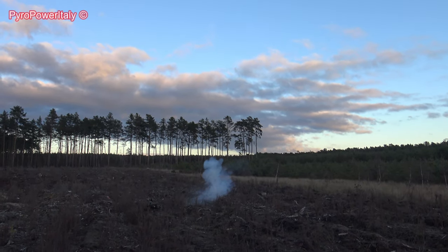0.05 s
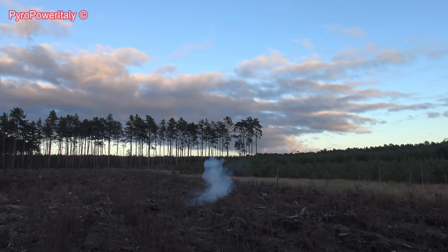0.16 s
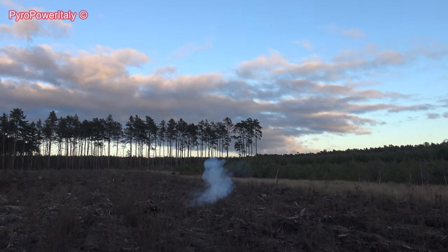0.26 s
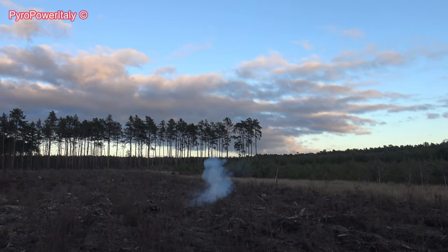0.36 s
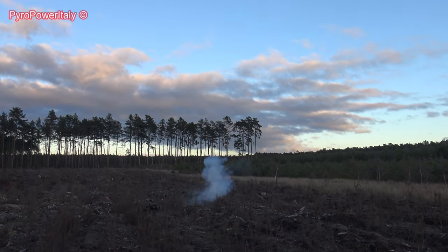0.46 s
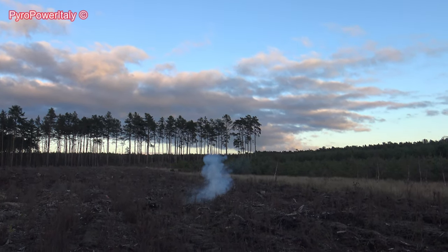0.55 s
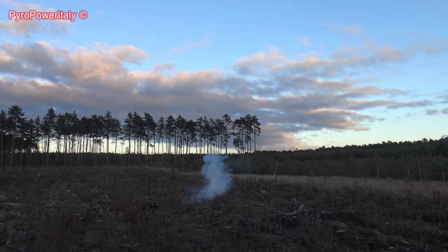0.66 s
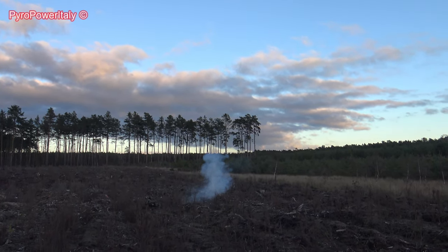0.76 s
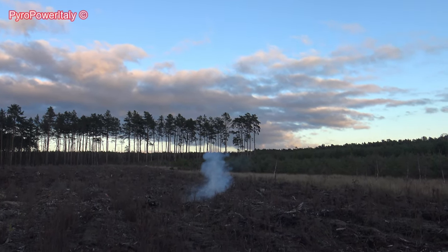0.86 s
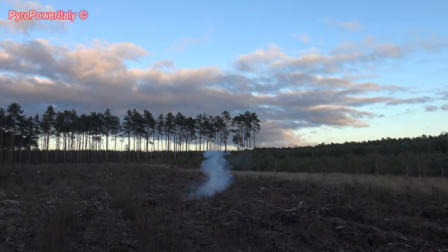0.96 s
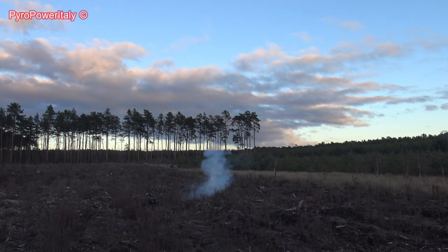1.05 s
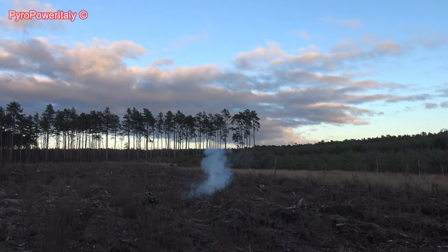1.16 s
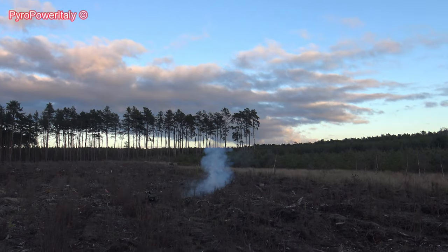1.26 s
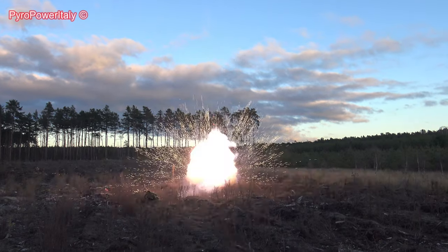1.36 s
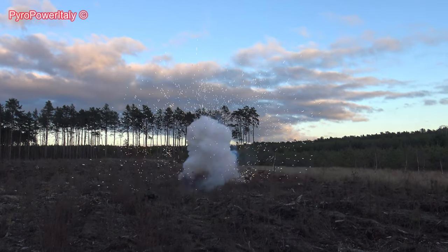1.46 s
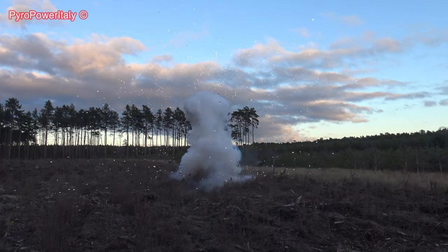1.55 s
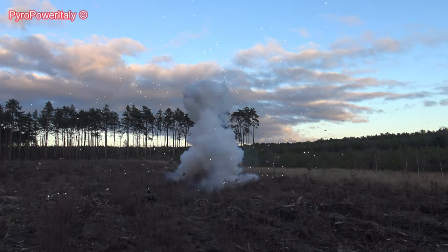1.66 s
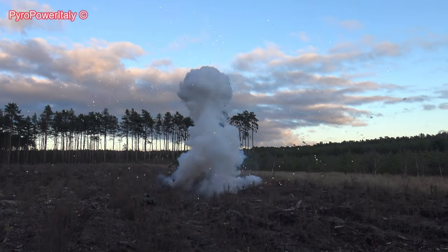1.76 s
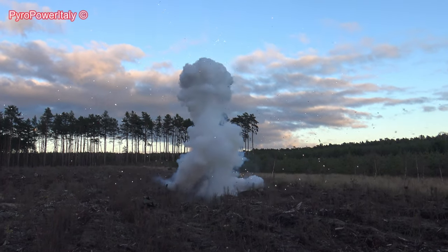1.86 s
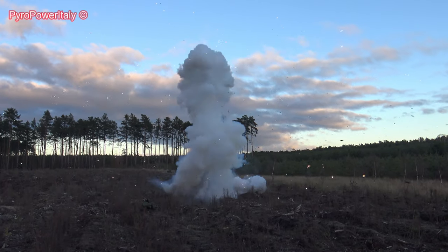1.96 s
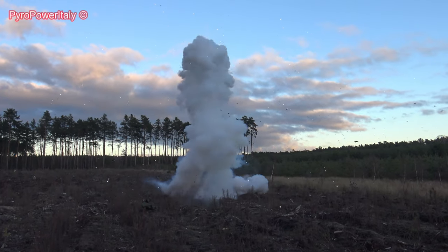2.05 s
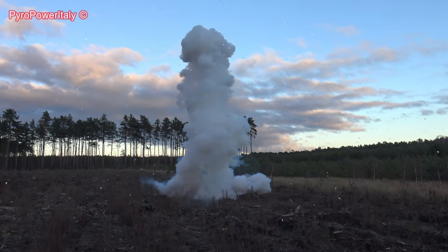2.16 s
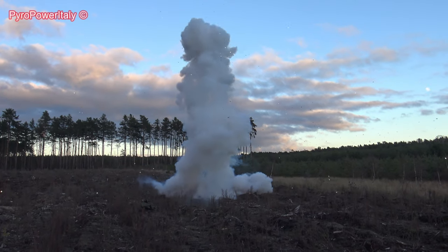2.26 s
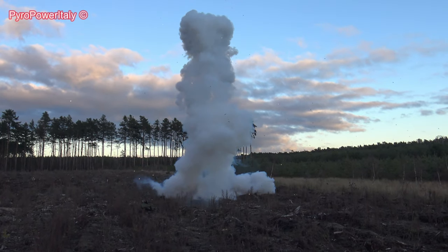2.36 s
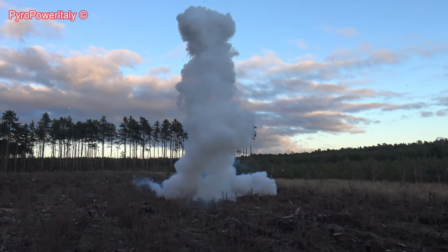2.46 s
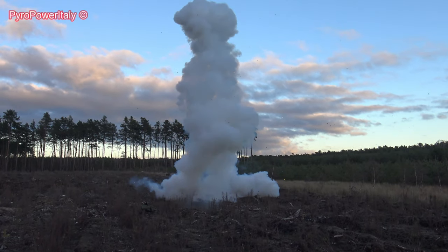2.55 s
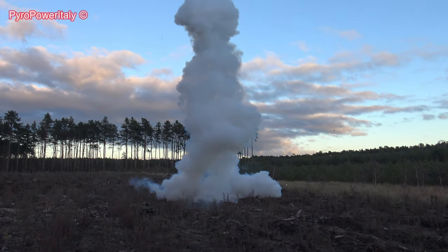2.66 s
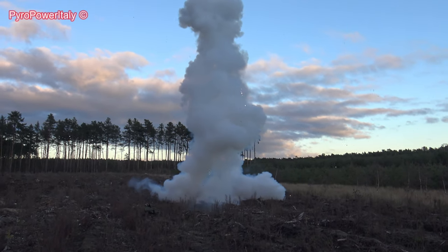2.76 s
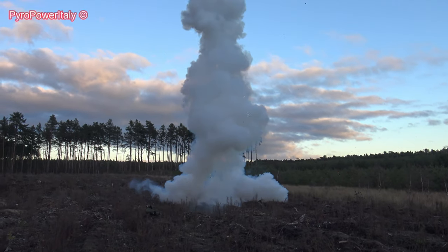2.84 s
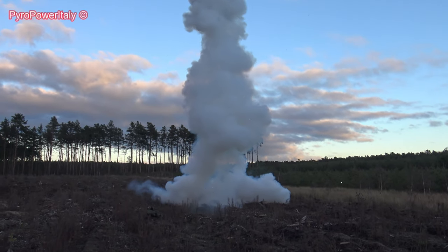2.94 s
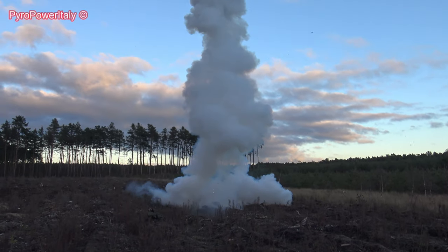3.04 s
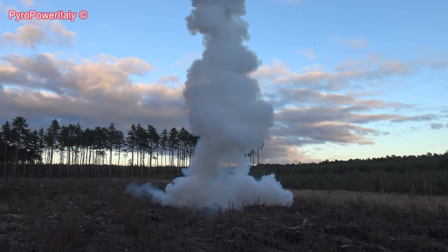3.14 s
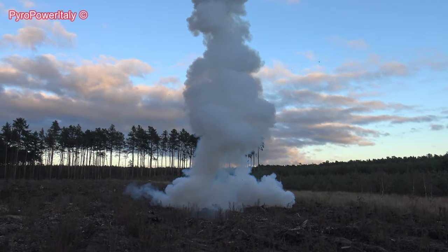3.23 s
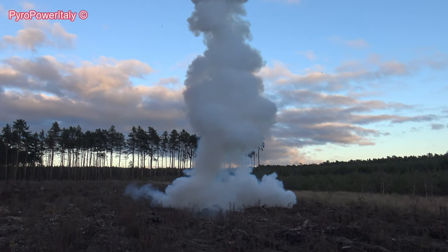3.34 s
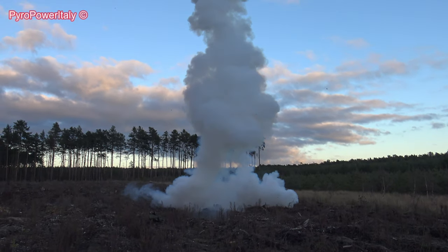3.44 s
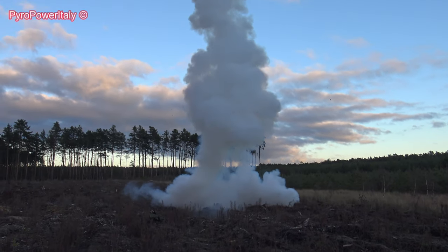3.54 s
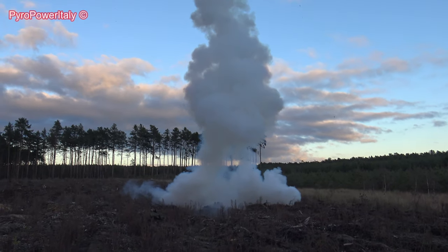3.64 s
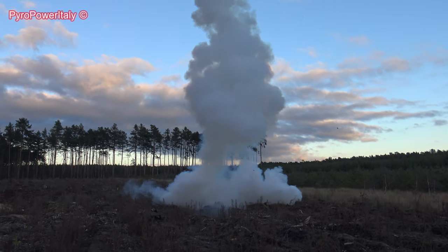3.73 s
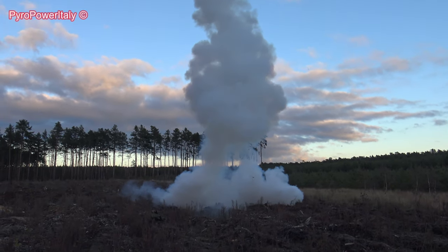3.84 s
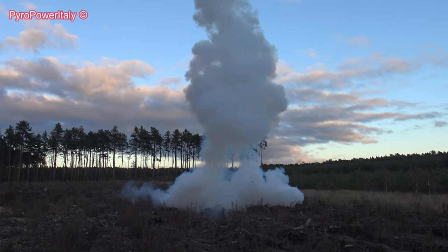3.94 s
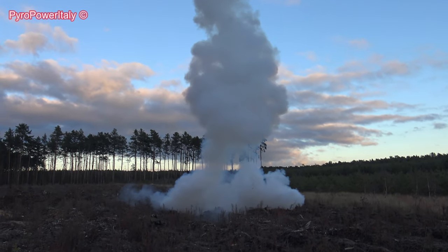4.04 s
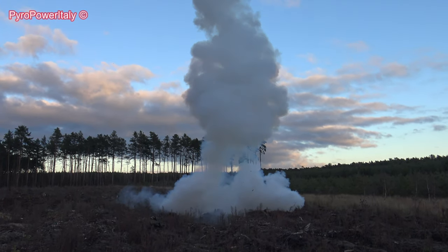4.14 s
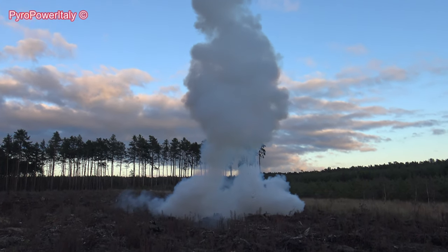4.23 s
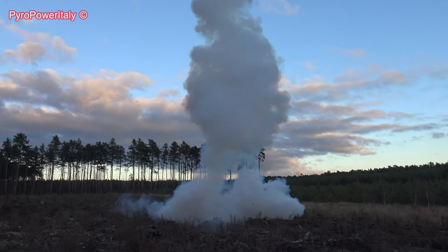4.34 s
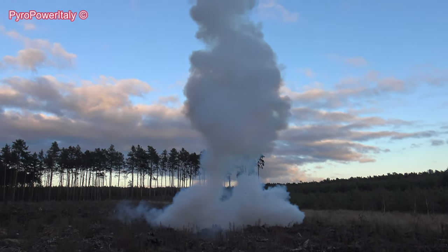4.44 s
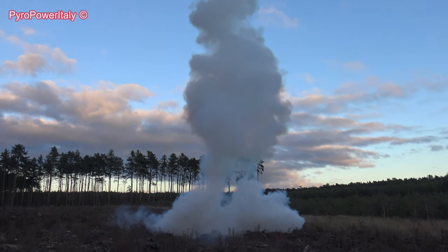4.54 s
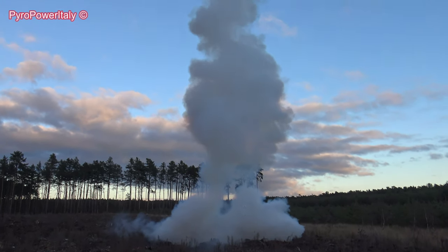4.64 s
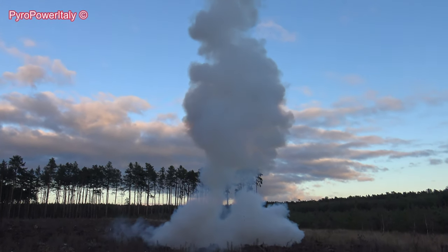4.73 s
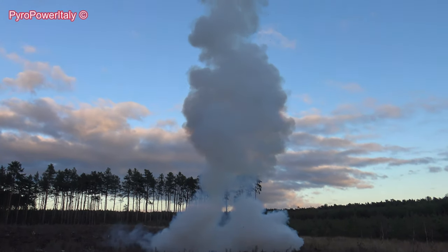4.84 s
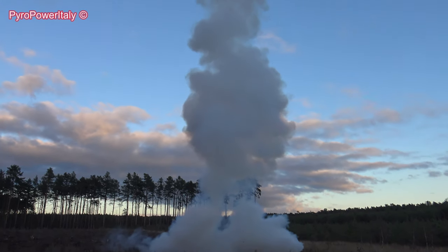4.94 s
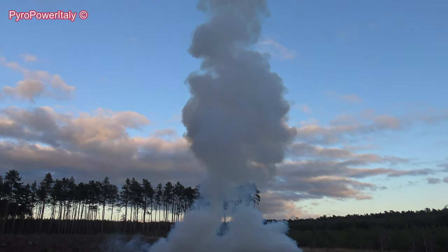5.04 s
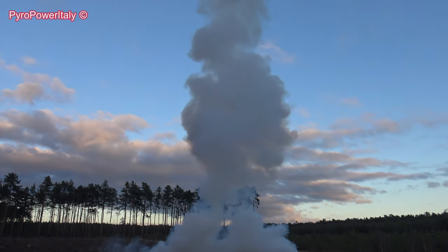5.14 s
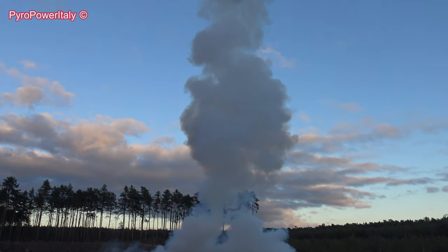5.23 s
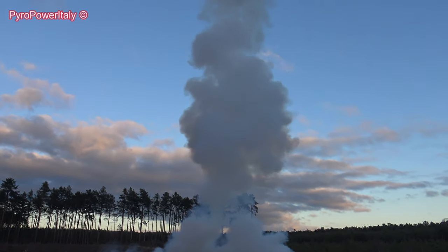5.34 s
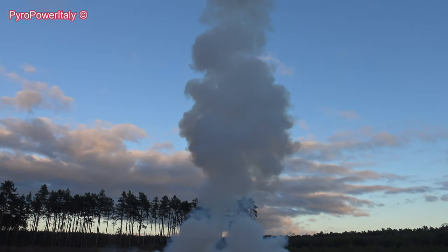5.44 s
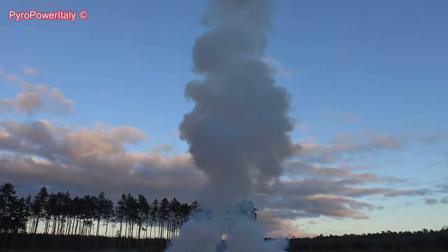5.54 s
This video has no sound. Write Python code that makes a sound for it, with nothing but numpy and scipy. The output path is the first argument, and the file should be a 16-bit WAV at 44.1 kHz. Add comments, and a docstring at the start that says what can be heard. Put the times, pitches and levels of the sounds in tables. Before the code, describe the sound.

Outdoors in a forest clearing, a fuse hisses for about a second and a half. One huge explosion overloads the microphone with a clipped crack and rapid near slaps. The trees answer with a swelling, roaring echo over deep rumble, growing duller as it fades, while small debris ticks down in light wind.

```python
"""A fuse hisses on a forest clearing, then a big ground firework explodes and overloads the microphone.
The fuse is coloured noise; a short bright burst of noise swells up just before the shock, a clipped
pressure swing with near reflections behind it. The bang rolls back from the trees as ever denser spikes,
duller with distance, over a deep noise rumble.
Bits of casing and soil patter down as short noise ticks and grains; a light wind blows throughout."""
import sys
import numpy as np
from scipy import signal
from scipy.fft import rfft, irfft, next_fast_len
from scipy.io import wavfile
from scipy.ndimage import uniform_filter1d, map_coordinates

SR = 44100
rng = np.random.default_rng(int(sys.argv[2]) if len(sys.argv) > 2 else 0)


def generate_wav(sig):
    """Save sig (samples, or channels by samples) to the path in sys.argv[1] as 16-bit PCM at SR."""
    pcm = np.round(np.clip(np.atleast_2d(sig).T, -1, 1) * 32767).astype(np.int16)
    wavfile.write(sys.argv[1], SR, pcm)


N = 246519
TIME = np.arange(N) / SR
BANG_S = 1.4732  # the shock reaches the microphone
ECHO_S = 1.637  # the first trees answer


def amp(db):
    """Decibels to gain."""
    return 10 ** (np.asarray(db) / 20)


def unit(x):
    """Scaled to rms 1."""
    return x / np.sqrt(np.mean(x ** 2) + 1e-20)


def along(points, hz):
    """(Hz, value) points read on a log frequency axis."""
    f, v = np.transpose(points)
    return np.interp(np.log(hz + 1), np.log(f + 1), v)


def wobble(rate):
    """A smooth random curve, rate knots a second."""
    knots = rng.standard_normal(int(N * rate / SR) + 4)
    return map_coordinates(knots, [TIME * rate])


def gate(start, fade):
    """Opens from 0 to 1 around the start time."""
    return .5 + .5 * np.tanh((TIME - start) / fade)


def swell(peak_s, rise_s, fall_s, hold_s=0):
    """Attack, hold and release as a gain; rise and fall are the times for 60 dB."""
    before = np.maximum(peak_s - TIME, 0)
    after = np.maximum(TIME - peak_s - hold_s, 0)
    return amp(-60 * (before / rise_s + after / fall_s))


def filtered(x, response):
    """x times a response of frequency."""
    m = next_fast_len(N + SR // 2)
    hz = np.fft.rfftfreq(m, 1 / SR)
    return irfft(rfft(x, m) * response(hz), m)[..., :N]


def coloured(x, spectrum):
    """x shaped by a (Hz, dB) spectrum, at rms 1."""
    return unit(filtered(x, lambda hz: amp(along(spectrum, hz))))


def pole(x, corner_hz, kind):
    """A gentle causal low-pass or high-pass."""
    b, a = signal.butter(1, min(corner_hz, SR / 2 - 1), kind, fs=SR)
    return signal.lfilter(b, a, x)


def spread(pair, side_db):
    """Two unrelated signals as the middle and the sides of a stereo pair."""
    mid, side = pair[0], amp(side_db) * pair[1]
    return unit(np.array([mid + side, mid - side]))


def panned(lean_db):
    """Left and right gains of constant power; a positive lean is to the left."""
    gains = amp(np.array([lean_db, -lean_db]).reshape(2, -1) / 2)
    return gains / np.sqrt(np.mean(gains ** 2, axis=0))


def rush(spectrum, side_db):
    """Stereo coloured noise of rms 1."""
    return coloured(spread(rng.standard_normal((2, N)), side_db), spectrum)


def spikes(per_second, scatter_db):
    """Two trains of random pressure spikes, of steady mean power."""
    chance = np.clip(per_second / SR, 1e-6, .9)
    sizes = unit(amp(scatter_db * rng.standard_normal((2, N))))
    train = (rng.random((2, N)) < chance) * sizes
    return (train - chance * sizes.mean()) / np.sqrt(chance)


def steadied(x, window):
    """Evens out the slow swells of a noise over a window in seconds."""
    power = uniform_filter1d(np.mean(x ** 2, axis=0), max(int(window * SR), 1))
    return x / np.sqrt(np.abs(power) + 1e-6)


def air(wind_db=-40, hiss_db=-62, drone_db=0):
    """Light wind on the microphone ports, a wavering low drone and a faint even hiss."""
    # spectrum of the wind: pitch_hz, relative_level_db (per Hz)
    wind_colour = [(15, -27.5), (30, 0.5), (48, 1.5), (62, -10.5), (85, -9.5), (130, -7), (220, -8.5),
                   (350, -14), (480, -26.5), (600, -19), (800, -25), (2000, -48)]
    # spectrum of the hiss: pitch_hz, relative_level_db (per Hz)
    hiss_colour = [(200, 1.5), (4500, -2.5), (7000, -3.5), (15500, -13)]
    # the faint low tone: pitch_hz, level_db (before its wavering)
    drone_tone = [(56.5, -42.5)]
    wind = amp(wind_db + 1.7 * wobble(5)) * rush(wind_colour, side_db=-1)
    hz, db = drone_tone[0]
    drone_gain = np.sqrt(2) * amp(db + drone_db + 2.7 * wobble(4.3))
    # the phase drifts separately in each channel
    drift = 1.3 * np.array([wobble(3.6), wobble(2.2)])
    drone = drone_gain * np.sin(2 * np.pi * hz * TIME + drift)
    return (wind + drone) * panned(-1.9) + amp(hiss_db) * rush(hiss_colour, side_db=0.5)


def fuse(flame_db=-34.0, jet_db=-39, flutter_db=0.76, waver_db=-0.2):
    """The flame roars in its tube; the bright spark jet drops back once the fire has burnt inside."""
    # spectrum of the flame: pitch_hz, relative_level_db (per Hz)
    flame_colour = [(200, -14), (350, -6.5), (750, -10), (1150, -6.5), (1650, -4), (2050, -7),
                    (2500, -14.5), (3300, -15), (5000, -22.5), (9000, -41.5), (15000, -56)]
    # spectrum of the spark jet: pitch_hz, relative_level_db (per Hz)
    jet_colour = [(1500, -27), (3000, -2.5), (4800, -3.5), (6000, -0.5), (7200, -6), (8300, -1.5),
                  (10000, -8.5), (12500, -10.5), (15500, -17.5)]
    # the fire burns into the casing, then slowly gathers again
    drop_s, drop_db, regrow_db_per_s = .4, 9.5, 2
    jet_change_db = gate(drop_s, 0.024) * (regrow_db_per_s * (TIME - drop_s) - drop_db)
    flame = amp(flame_db) * rush(flame_colour, side_db=-21.5)
    jet = amp(jet_change_db + jet_db) * rush(jet_colour, side_db=-7.0)
    unsteadiness = amp(flutter_db * wobble(30) + waver_db * wobble(2.7))
    return (flame + jet) * unsteadiness * (1 - gate(BANG_S, .004))


def bright_burst(burst_db=-8, scatter_db=-18, crackle_db=3):
    """A short bright burst of noise swells up just before the shock; a duller, crackling scatter follows."""
    # spectrum of the bright noise burst: pitch_hz, relative_level_db (per Hz)
    burst_colour = [(60, -21), (150, -2.5), (400, -4.5), (650, -4), (1100, -6), (1700, 1.5), (2600, -5),
                    (4000, -6.5), (6500, -8.5), (10000, -9), (13000, -17.5), (15500, -18)]
    # spectrum of the scatter off the rough ground: pitch_hz, relative_level_db (per Hz)
    scatter_colour = [(100, 2), (280, 4.5), (600, -7.5), (1050, 0), (1600, 0.5), (2500, -4.5),
                      (4000, -10.5), (6500, -15), (10000, -23), (15500, -37)]
    burst = swell(1.468, rise_s=0.069, fall_s=0.056) * amp(burst_db + .88 * wobble(700))
    scatter = swell(1.6, rise_s=.9, fall_s=0.65) * gate(BANG_S, .004)
    scatter = scatter * amp(scatter_db + crackle_db * wobble(220))
    return burst * rush(burst_colour, side_db=-12.0) + scatter * rush(scatter_colour, side_db=-7)


def shock(swing_hz=97, drive_db=22, life=0.0092, turmoil=0.23, level_db=-2):
    """A flick of push, then a violent suction and push slam the diaphragm from stop to stop; it sags back."""
    t = TIME - BANG_S
    turmoil_colour = [(200, 2.0), (1200, -3.0), (4000, -12.5), (15000, -35.0)]  # Hz, dB per Hz
    chatter = turmoil * rush(turmoil_colour, side_db=-4.5)
    swing = (chatter - np.sin(2 * np.pi * swing_hz * t)) * ((t > 0) & (t < life))
    leading_edge = (t > -.0003) & (t <= 0)
    pinned = np.tanh(amp(drive_db) * (swing + leading_edge))
    return amp(level_db) * pole(pinned, 41, "high")


def fronts(grit=0.41, rise=0.13, edge_hz=3000, level_db=2):
    """Each near reflection is a gritty push with a shallow suction behind it; longer ones rise more slowly."""
    # shock fronts thrown back by near ground and stumps: start_s, relative_level_db, push_length_s
    near_fronts = [(1.489, 2, .0012), (1.4966, -6.5, .0039), (1.501, 4.5, .002), (1.5092, 0, .0017),
                   (1.518, -2, .003), (1.533, -2.5, .004), (1.5417, -0.5, .003), (1.56, 3, .003),
                   (1.644, 6.5, .0005)]
    out = np.zeros((2, N))
    t = np.arange(SR // 20) / SR
    for s, db, length in near_fronts:
        u = t / max(length, 1e-4)
        pressure = 1 - u + grit * rng.standard_normal((2, len(t)))
        push = pressure * np.exp(-u) * (1 - np.exp(-u / rise))
        out[:, round(s * SR):][:, :len(t)] += amp(db + level_db) * push * panned(rng.normal(0, 4))
    return pole(out, edge_hz, "low")


def throb(level_db=-10.5, overtone_db=-21, attack_s=0.009, release_s=.005, waver_db=2.5):
    """A short, nearly pure low throb follows the shock and wavers as it sounds."""
    start_s, length_s, pitch_hz = 1.548, .085, 104
    t = np.maximum(TIME - start_s, 0)
    phase = 2 * np.pi * pitch_hz * t
    envelope = (1 - np.exp(-t / attack_s)) * (1 - gate(start_s + length_s, release_s))
    tone = np.sin(phase) + amp(overtone_db) * np.cos(2 * phase)
    return np.sqrt(2) * amp(level_db + waver_db * wobble(54)) * envelope * tone


def stands(fade_s=0.022):
    """The change in level and treble of the roll while dense stands of trees answer."""
    # dense stands of trees: start_s, length_s, extra_level_db, extra_treble_db_per_khz
    tree_stands = [(2.14, 0.23, -0.3, 0.5), (3.24, .28, 1.26, 0.1), (3.504, 0.3, 1.24, 2),
                   (4.343, 0.049, 1.5, -0.3), (4.885, 0.18, 1.1, -1)]
    answering = np.array([gate(s, fade_s) - gate(s + length, fade_s) for s, length, _, _ in tree_stands])
    _, _, extra, treble = np.transpose(tree_stands)
    return extra @ answering, treble @ answering


def roll(first_rate=600, growth=2.2, diffuse=0.64, ground_q=1.13, patchy_db=0.48):
    """Trunks send back ever more small shocks; the air takes their treble and the soft ground their bass."""
    # spectrum of the forest's answer: pitch_hz, relative_level_db (per Hz)
    forest_colour = [(60, -15.5), (120, -11), (230, -5.5), (350, -1.5), (450, -0.5), (600, 2), (900, -.5),
                     (1500, -2), (2500, -6), (5000, -11.5), (10000, -11.5), (15500, -20.5)]
    # the soft ground's low-cut along the echoes' path: time_s, cut_hz
    ground_cut = [(1.64, 150), (2.05, 278), (2.45, 533), (3, 378), (4.3, 325), (5.59, 211)]
    # most trees answer at once at the peak; the slopes stand before and after it
    peak_s, level_db, rise_db_per_s, fall_db_per_s = 2.82, -9, 6.5, 4.5
    # treble loss per kHz after a second of travel; its growth as a power of that time
    air_loss_db, air_loss_power = 6, 0.7
    # the nearest trees stand to the left; later echoes come from all round
    lean_db, lean_fade_s = 12, 0.26

    travel = np.maximum(TIME, ECHO_S) - BANG_S
    extra_db, treble_db = stands()
    rate = first_rate * (travel / (ECHO_S - BANG_S)) ** growth
    echoes = spikes(rate, scatter_db=4.0) + diffuse * rng.standard_normal((2, N))
    hz, t, z = signal.stft(spread(echoes, side_db=-7.5), SR, nperseg=1024)
    loss = np.interp(t, TIME, air_loss_db * travel ** air_loss_power - treble_db)
    cut_hz = np.interp(t, *np.transpose(ground_cut))
    # the ground cancels the bass and lifts the band just above it
    ratio = hz[:, None] / cut_hz
    ground = ratio ** 2 / np.hypot(1 - ratio ** 2, ratio / ground_q)
    colour = amp(along(forest_colour, hz)[:, None] - np.outer(hz / 1000, loss)) * ground
    colour /= np.sqrt(np.mean(colour ** 2, axis=0))
    # clumps of trees answer more strongly at some pitches and moments
    patches = uniform_filter1d(rng.standard_normal(z.shape[1:]), size=9, axis=0)
    patches = unit(uniform_filter1d(patches, size=5, axis=1))
    sound = signal.istft(z * colour * amp(patchy_db * patches), nperseg=1024)[1][:, :N]
    arch_db = np.minimum(rise_db_per_s * (TIME - peak_s), fall_db_per_s * (peak_s - TIME))
    lean = lean_db * np.exp(-np.maximum(TIME - ECHO_S, 0) / lean_fade_s)
    return sound * amp(level_db + arch_db + extra_db) * panned(lean) * gate(ECHO_S, .012)


def rumble(boom_db=.5, deep_db=-22.0, sunk_hz=66):
    """Bass from the forest edge and hills: booms over a long rumble that sinks in pitch as it fades."""
    # spectrum of the booms: pitch_hz, relative_level_db (per Hz)
    boom_colour = [(40, -24.5), (72, -3), (98, -2), (135, -11.5), (220, -11), (400, -22), (900, -54.5),
                   (2000, -85.5)]
    # spectrum of the deep rumble: pitch_hz, relative_level_db (per Hz)
    deep_colour = [(15, -31.5), (28, -18.5), (42, -5), (57, 0.5), (70, -1.5), (88, -22.5), (200, -51.5),
                   (500, -100)]
    # separate booms from the forest edge and the hills: peak_s, relative_level_db
    boom_times = [(1.85, -19), (2.25, -21), (3.2, -29), (5.1, -42.5)]
    deep_s, deep_hold_s = 2, 0.97  # full strength reached, and how long it holds
    boom_power = sum((amp(db) * swell(s, rise_s=3.6, fall_s=2.5)) ** 2 for s, db in boom_times)
    boom_noise = steadied(rush(boom_colour, side_db=-10.5), window=.15)
    upper = amp(boom_db) * np.sqrt(boom_power) * boom_noise
    near = rush(deep_colour, side_db=-16)
    far = unit(filtered(near, lambda hz: 1 / (1 + (hz / sunk_hz) ** 10)))
    sunk = gate(deep_s + deep_hold_s, .4)
    deep = swell(deep_s, rise_s=3.5, fall_s=9.6, hold_s=deep_hold_s)
    lower = amp(deep_db) * deep * steadied((1 - sunk) * near + sunk * far, window=.12)
    return (upper + lower) * gate(ECHO_S, 0.011)


def debris(tick_t60=.013, tick_db=-3.0, grain_rate=900, clump_db=3.0, soil_db=0):
    """Larger bits tick in the dry brush among clumped showers of fine soil."""
    # larger falling bits: start_s, relative_level_db, left_minus_right_db
    bits = [(2.5556, -35, 1.5), (2.6344, -33, -9.0), (2.6404, -37, -5), (2.673, -33.5, -5.5),
            (2.797, -37.5, -8.5), (2.9241, -41, 3.5), (3.2001, -45, 1.5), (3.4948, -41, 0),
            (3.5552, -41.5, -6), (3.77, -41.5, -3), (3.9838, -37.5, 1), (4.3778, -48, -1),
            (4.4426, -40.5, 1.5), (4.5057, -44, -2.5), (4.7646, -47.5, 7), (4.8105, -44.5, -3)]
    # spectrum of the dry brush they land in: pitch_hz, relative_level_db (per Hz)
    brush_colour = [(1000, -24), (3500, -4.5), (6000, -0.5), (9000, -3), (12000, -11), (15500, -12)]
    # showers of fine soil: peak_s, level_db (before clumping), time_to_rise_or_fall_by_60_db_s
    soil_showers = [(2.3, -56.5, 1.3), (2.65, -50.5, 0.33), (3.04, -59.5, 0.5), (3.31, -55.5, 0.5),
                    (3.57, -52.5, 0.83), (3.8, -64.5, .4)]
    strikes = np.zeros((2, N))
    t = np.arange(SR // 10) / SR
    for s, db, lean in bits:
        strikes[:, round(s * SR):][:, :len(t)] += amp(db + tick_db - 60 * t / tick_t60) * panned(lean)
    ticks = strikes * rush(brush_colour, side_db=-1)
    showers = sum(amp(db) * swell(s, length, length) for s, db, length in soil_showers)
    landings = spread(spikes(grain_rate, scatter_db=0.5), side_db=-2.5)
    grains = coloured(landings, brush_colour) * panned(-5.5)
    return ticks + showers * amp(soil_db + clump_db * wobble(50)) * grains


def scene():
    """Fuse, explosion, echoes and fallout in the open air."""
    blast = bright_burst() + shock() + fronts() + throb()
    return air() + fuse() + blast + roll() + rumble() + debris()


def record(dry):
    """The recorder rounds off peaks near full scale and keeps nothing above its band limit."""
    top_hz = 15750
    rounded = dry / (1 + dry ** 8) ** (1 / 8)
    return filtered(rounded, lambda hz: hz < top_hz)


dry = scene()
out = record(dry)
generate_wav(out)
```